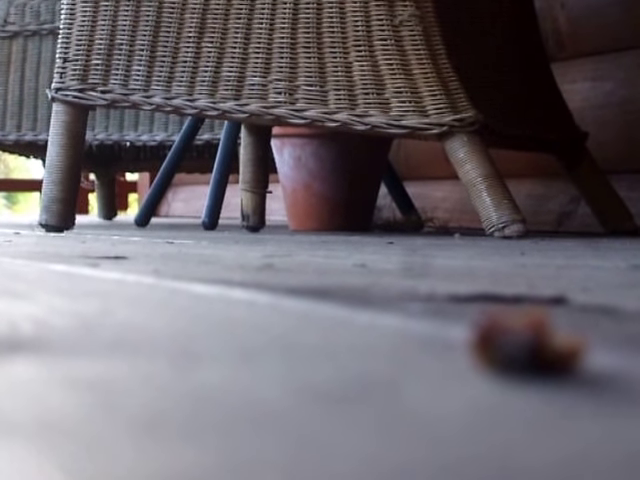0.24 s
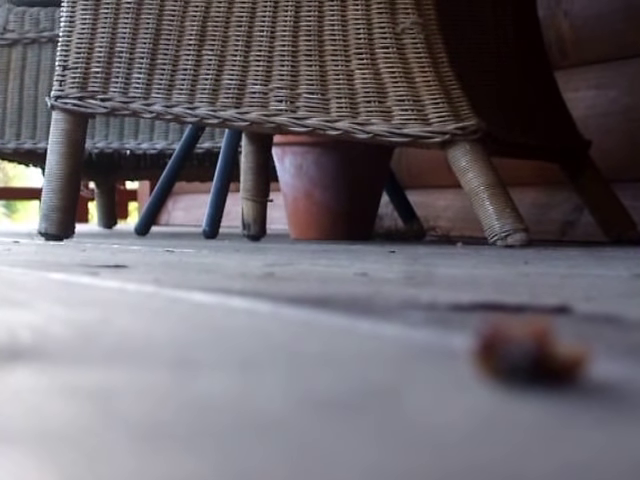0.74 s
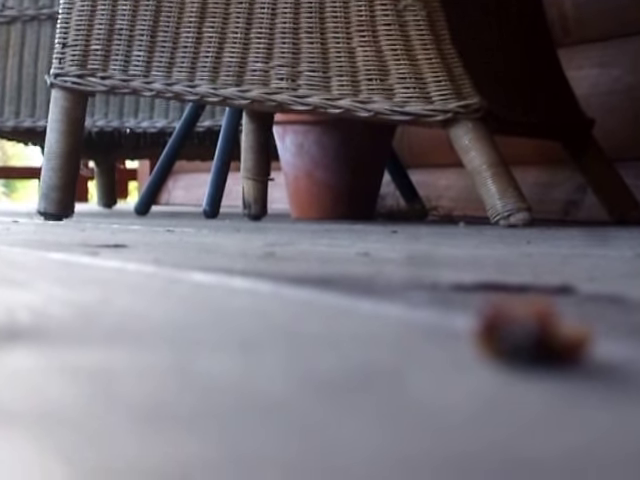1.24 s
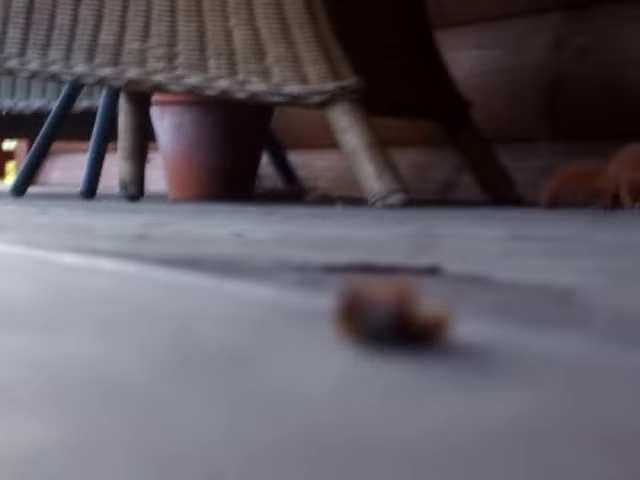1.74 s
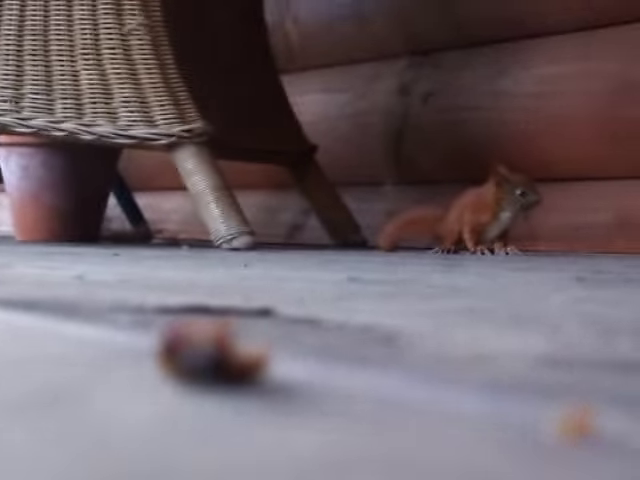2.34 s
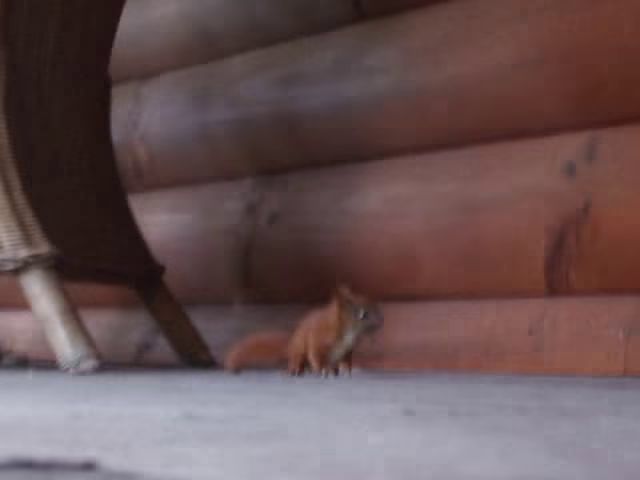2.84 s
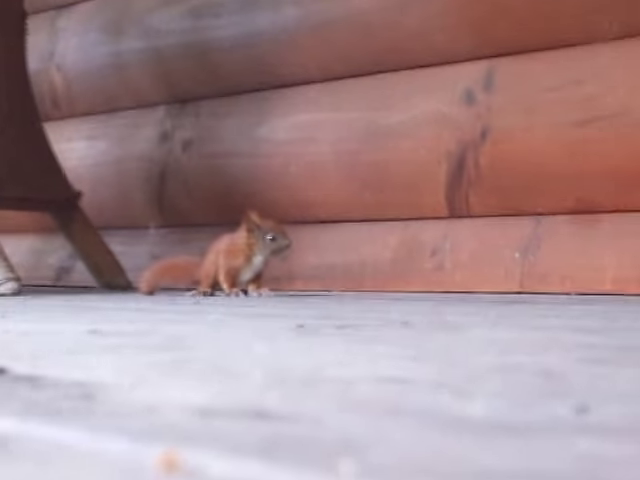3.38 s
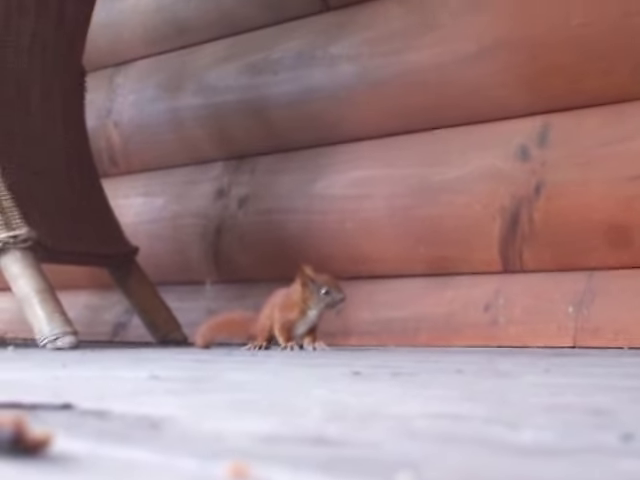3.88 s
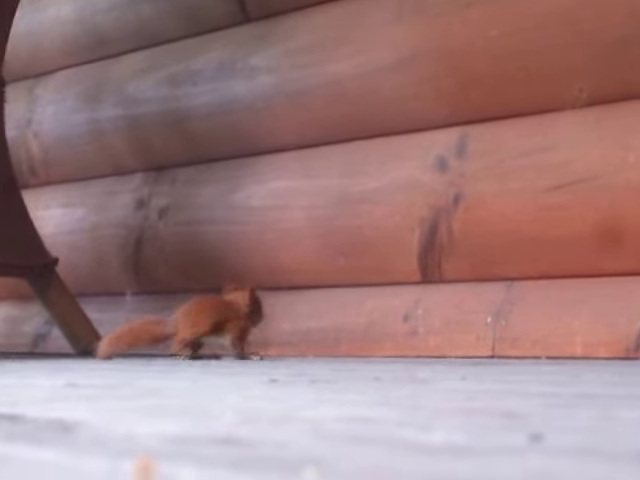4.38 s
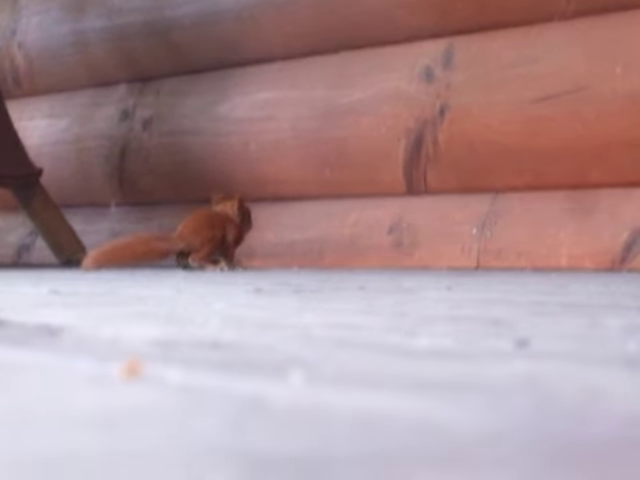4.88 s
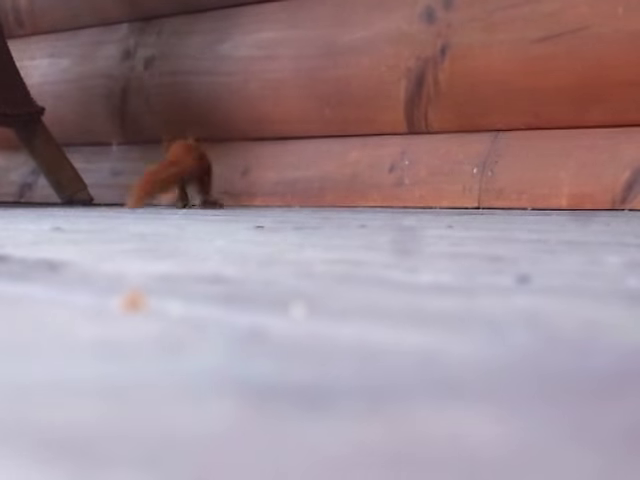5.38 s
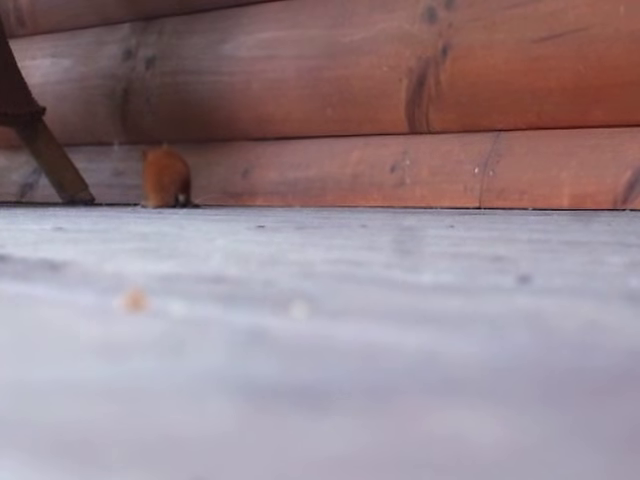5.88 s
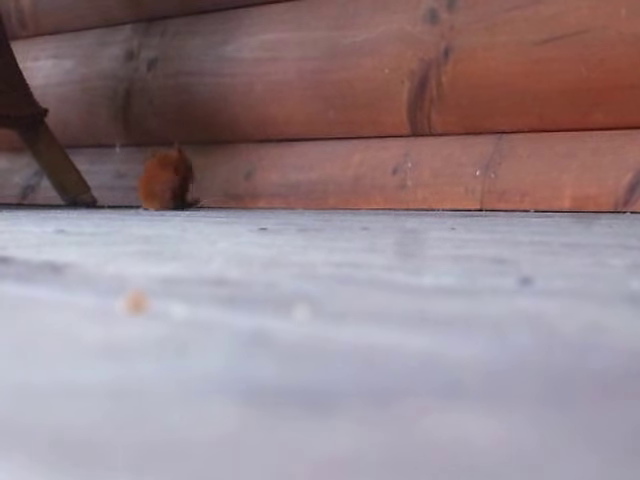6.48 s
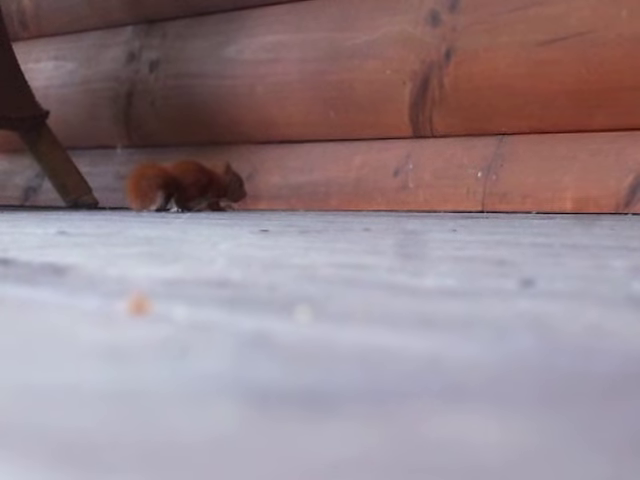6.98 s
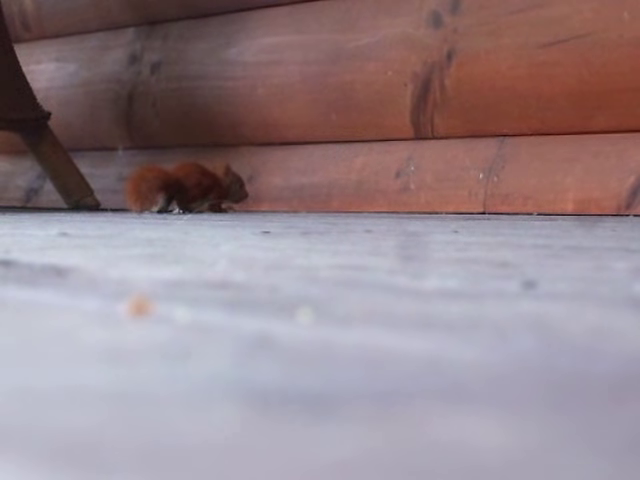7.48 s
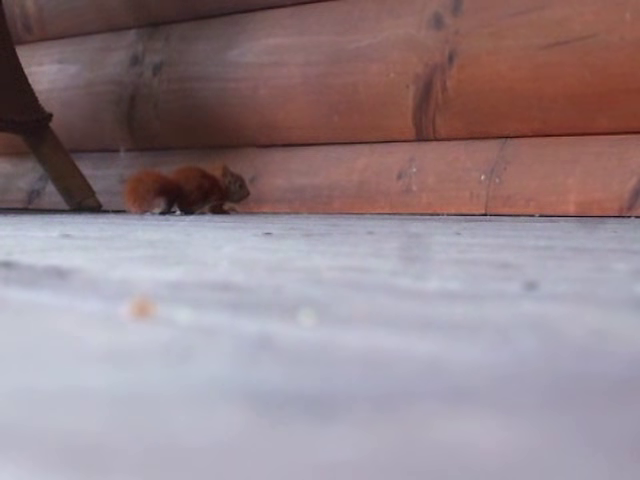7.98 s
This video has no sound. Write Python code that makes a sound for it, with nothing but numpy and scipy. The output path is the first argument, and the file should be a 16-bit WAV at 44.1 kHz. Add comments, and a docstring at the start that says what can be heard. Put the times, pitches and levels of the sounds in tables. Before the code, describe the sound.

Over steady outdoor hiss, a small camera lying on porch boards is brushed dully, then shoved in jerky, gritty scrapes with a brief squeal. After a pause it rocks with a sharp woody knock, then a soft thud. A squirrel a little way off makes sparse claw scratches, faint paw pats and grit ticks, with soft rustling near the end. A distant bird gives a few thin rising chirps.

```python
"""Porch with a squirrel, heard from a small camera resting on the boards; bird calls and hiss throughout.
0.3 s: dull brushing (noise in resonances). 0.6-1.6 s: camera shoved over grit (random slips ringing modes).
3.4 and 3.7 s: camera rocks and knocks, first sharply, then softly (decaying sines).
4.1-8.2 s: claws, paws and grit ticks (short slip bursts in resonances); from 6.8 s swells of rustle; 7.6 s: a wipe.
The bird, at 0.5, 2.1, 3.4 and 5.4 s, is a rising sine; the hiss is steady coloured noise."""
import sys
import numpy as np
from scipy import signal
from scipy.fft import rfft, irfft
from scipy.io import wavfile
from scipy.ndimage import uniform_filter1d

SR = 44100
rng = np.random.default_rng(int(sys.argv[2]) if len(sys.argv) > 2 else 0)


def bounce(signal):
    """Save signal as a 16-bit WAV file at the path given by the first command-line argument."""
    frames = np.transpose(np.atleast_2d(signal))
    limited = np.clip(frames, -1, 1)
    pcm = np.round(limited * 32767).astype(np.int16)
    wavfile.write(sys.argv[1], SR, pcm)


N = 362943

# Shoves of the camera: start t/s, length/s, rubbing level/dB, grit level/dB, sag over the shove/dB
SHOVES = [(0.567, 0.058, -36, -38.5, 5.5), (0.651, 0.016, -33.5, -39, -0.5), (.673, 0.051, -41, -45.5, 2),
          (0.812, 0.041, -37, -41, 2), (0.877, 0.067, -38.5, -43.5, 4), (0.95, 0.23, -46.5, -52, -2),
          (1.154, 0.063, -35, -36, -1), (1.216, 0.071, -37.5, -38, 5), (1.285, 0.026, -37, -36.5, 0),
          (1.306, 0.16, -31, -33.5, 6), (1.444, 0.11, -33.5, -34, 4)]
# Base catching on grit as it stops: start t/s, length/s, level/dB
CATCH = (1.538, 0.0094, -33)
# Squeal in the first shove: start t/s, length/s, level/dB
SQUEAL = (.583, 0.032, -29.5)
# Creeping base, one board mode stands out: start t/s, length/s, level/dB
CREEPS = [(0.869, .29, -42.5), (1.185, 0.04, -29)]
# Resonances of rubbing, grit, squeal and creep: f/Hz, width of one pass/Hz, relative level/dB
RUB_MODES = [(145, 9.1, -6), (268, 130, 1), (475, 74, 2), (605, 130, 3), (744, 62, 0.5), (1010, 32, 0),
             (1076, 39, -4.5)]
GRIT_MODES = [(2470, 160, 3.5), (2800, 1070, 8.5), (3420, 500, 5.5), (4700, 630, 1), (5700, 440, 2),
              (6180, 270, -2)]
SQUEAL_MODES = [(2000, 130, -8), (2500, 530, -12), (4550, 250, -9.5), (5430, 200, -12.5)]
CREEP_MODES = [(722, 200, 0)]
# Camera rocking on its base: t/s, relative level/dB, contact hardness as cut-off f/Hz
KNOCKS = [(3.434, 0, 7660), (3.4394, -3, 1100), (3.735, -2.5, 235), (3.7393, -2.5, 226),
          (3.7441, -9.5, 191)]
# Camera and board under a knock: f/Hz, level/dB, t60/s
KNOCK_MODES = [(134, -32, .3), (180, -41, 0.16), (276, -25, 0.094), (363, -17.5, 0.025), (463, -22, .04),
               (550, -16.5, 0.019), (760, -8, 0.018), (970, -33, .06), (1817, -26.5, .018),
               (2480, -16, 0.0081), (3447, -21.8, 0.01), (4900, -21, .0047), (5950, -19, 0.0053)]
# Claw scratches, paw landings, grit ticks: t/s, rms level over the length/dB, length/s, centre f/Hz
SCRATCHES = [(4.149, -38, 0.0013, 2800), (4.1785, -26.5, 0.0055, 2900), (4.1895, -31, .002, 2350),
             (4.369, -45.5, 0.016, 2200), (4.5685, -41, 0.0055, 2300), (4.579, -44, 0.01, 1900),
             (4.7478, -28.5, 0.0051, 2270), (4.7598, -29.5, 0.005, 2400), (5.819, -33, 0.0051, 3100),
             (5.823, -30.5, 0.0069, 3830), (5.830, -42, 0.022, 3100), (5.848, -50, 0.04, 3000),
             (5.982, -46, 0.011, 3320), (6.1835, -40.5, 0.0052, 3540), (6.192, -69, 0.016, 2800),
             (7.8285, -33, 0.015, 3370), (7.839, -34, 0.0066, 2800), (8.016, -36, 0.0093, 2400),
             (8.174, -44, 0.011, 1970), (8.187, -37.5, 0.015, 2720)]
PATS = [(4.083, -49, 0.015, 460), (4.184, -38.5, 0.0049, 344), (4.215, -48, 0.021, 607),
        (4.307, -43, 0.0061, 570), (4.37, -54.5, 0.092, 490), (4.505, -47.5, 0.049, 770),
        (4.57, -44, 0.034, 870), (4.752, -46, 0.024, 1120), (5.595, -49.5, 0.048, 630),
        (6.184, -54, 0.012, 430), (6.365, -53, 0.023, 377), (7.839, -34.5, 0.0076, 345),
        (7.68, -50.5, 0.015, 290), (7.85, -48, .035, 270), (8.021, -42.5, 0.011, 350),
        (8.197, -38, 0.0072, 320)]
TICKS = [(4.1495, -44, 0.0023, 5030), (4.3085, -37, 0.0028, 2000), (5.822, -38.5, .004, 6500),
         (6.184, -45.5, 0.0014, 2930), (6.746, -49, 0.0052, 2000), (6.769, -45.5, 0.01, 1270),
         (7.061, -40.5, 0.0044, 3500), (8.084, -42, 0.0025, 2500)]
# Resonances of claw, board under paw, tick: f/Hz, width of one pass/Hz, level before centre weighting/dB
CLAW_MODES = [(1010, 460, 14), (2200, 150, 3.5), (2304, 240, 2), (2730, 250, 0), (2990, 220, 0.5),
              (3540, 200, -7), (4200, 490, -7.5), (5430, 410, -9.5)]
PAW_MODES = [(299, 14, 1), (327, 55, 2.5), (376, 170, -3.5), (520, 270, -3), (740, 91, -1.5),
             (890, 250, -6)]
TICK_MODES = [(870, 1400, 8.5), (2800, 2700, 3), (6000, 2800, 1)]
# Rustle swells: peak t/s, rise time constant/s, fall time constant/s, peak level/dB
RUSTLES = [(6.801, 0.056, 0.094, -39.5), (7.06, .07, .065, -40.5), (7.66, 0.11, 0.14, -49),
           (8.17, .35, .5, -42)]
# Rustle spectrum shape: f/Hz, relative level per Hz/dB
RUSTLE_SPECTRUM = [(100, -31.5), (300, -8.5), (850, 4.5), (1400, 4.5), (2000, 3.5), (3300, 3.5), (4500, 3),
                   (6400, -1)]
# Dull brushing: start t/s, length/s, level/dB
BRUSH = (0.303, 0.245, -47.5)
# Brushing resonances: f/Hz, width/Hz, relative level/dB
BRUSH_MODES = [(510, 76, 0), (1040, 140, 1), (1450, 740, -14)]
# Wipe: rms level before its fades/dB, start f/Hz, end f/Hz
WIPE = (-45, 620, 1800)
# Bird calls: start t/s, length/s, start f/Hz, end f/Hz, starting level/dB
BIRD_CALLS = [(0.452, .095, 3620, 4550, -59), (2.075, 0.062, 4080, 4820, -53),
              (3.447, .1, 3590, 4560, -49.5), (5.42, .122, 3680, 4700, -53)]
# Reverberation of the porch: f/Hz, t60/s
PORCH_T60 = [(130, 0.22), (500, 0.39), (2500, 0.22), (7000, 0.11)]
# Spectrum shape of outdoor air and microphone hiss: f/Hz, relative level per Hz/dB
AIR_SPECTRUM = [(25, -4.5), (60, -2.5), (120, -4), (250, -4.5), (400, -3.5), (550, -3), (700, -3),
                (950, -1), (1400, -7.5), (2000, -6.5), (2800, -6), (4200, -8), (6200, -10), (7000, -15)]

SHOVE_ATTACK_S, SHOVE_RELEASE_S = 0.015, 0.0075
SQUEAL_ATTACK_S, BRUSH_ATTACK_S = 0.022, 0.046
CREEP_SAG_DB, CALL_FADE_DB = 5, 3.5
SWEEP_EXPONENT = 1.35  # above 1: the call climbs ever faster
WIPE_START_S, WIPE_LENGTH_S, WIPE_WIDTH_HZ = 7.6, 0.09, 650
AIR_RMS_DB = -47
EDGE_HZ = 6850


def slide():
    """Camera base sticks and slips over grit, ringing board and housing."""
    pressure = judder(per_s=110, depth_db=1.56)
    fine = pressure * grains(N, per_s=9000, spread_db=4.0)
    coarse = pressure * grains(N, per_s=700, spread_db=2.0)

    rub_force = sum(shove(s, length, db, sag) for s, length, db, _, sag in SHOVES)
    grit_force = sum(shove(s, length, db, sag) for s, length, _, db, sag in SHOVES)
    grit_force = grit_force + shove(*CATCH)
    squeal_force = envelope(*SQUEAL, SQUEAL_ATTACK_S, SHOVE_RELEASE_S, sag_db=2.5)
    creep_force = sum(shove(*row, CREEP_SAG_DB) for row in CREEPS)

    rub_tone = cut(ring(fine + 0.4 * coarse, RUB_MODES), hz=1520, side="low", order=6)
    rub = evened(rub_tone) * rub_force
    grit = evened(ring(fine + 0.72 * coarse, GRIT_MODES)) * grit_force
    squeal = evened(ring(fine, SQUEAL_MODES)) * squeal_force
    creep_tone = ring(ring(coarse, CREEP_MODES), CREEP_MODES)
    creep = evened(creep_tone) * creep_force
    return rub + grit + squeal + creep


def knocks():
    """Base strikes the board in quick contacts; softer contacts drive the high modes less."""
    t = np.arange(SR // 2) / SR
    out = np.zeros(N)
    for s, db, hard_hz in KNOCKS:
        for hz, mode_db, t60_s in KNOCK_MODES:
            push = gain_of(db + mode_db) / np.sqrt(1 + (hz / hard_hz) ** 4)
            decay = np.exp(-np.log(1000) * t / t60_s)
            add(out, s, push * decay * np.sin(2 * np.pi * hz * t))
    return out


def squirrel():
    """Claws scratch, paws pat the boards and bits of grit tick."""
    claws = strokes(SCRATCHES, CLAW_MODES, octaves=0.46, release_s=0.00065, snag_db=19)
    paws = strokes(PATS, PAW_MODES, octaves=0.58, release_s=0.0015, snag_db=23.5)
    ticks = strokes(TICKS, TICK_MODES, octaves=1.9, release_s=0.0008, snag_db=21)
    return claws + paws + ticks


def strokes(rows, body, octaves, release_s, snag_db):
    """A first snag and a short run of slips ring the body's modes near each contact's centre frequency."""
    t = np.arange(SR // 8) / SR
    out = np.zeros(N)
    for s, db, length, centre_hz in rows:
        contact = np.exp(-np.maximum(t - length, 0) / release_s)
        snag = gain_of(snag_db) * (t == 0)
        drive = contact * grains(len(t), per_s=8300, spread_db=3.5) + snag
        sound = np.zeros(len(t))
        for hz, width_hz, mode_db in body:
            weight = np.exp(-0.5 * (np.log2(hz / centre_hz) / octaves) ** 2)
            mode = [(hz, width_hz, 0)]
            sound += gain_of(mode_db) * weight * ring(ring(drive, mode), mode)  # twice: steep skirts
        # window rms rescaled to rms over the contact length
        add(out, s, gain_of(db) * evened(sound) * np.sqrt(length / t[-1]))
    return out


def rustle():
    """Dense fine grains swell as soft wide rustle; resonant noise makes a duller brushing."""
    t = np.arange(N) / SR
    swells = np.zeros(N)
    for s, rise_s, fall_s, db in RUSTLES:
        swells += gain_of(db) * np.exp(-np.maximum((s - t) / rise_s, (t - s) / fall_s))
    wide = coloured(grains(N, per_s=9000, spread_db=4.5), RUSTLE_SPECTRUM) * swells
    brushing = envelope(*BRUSH, BRUSH_ATTACK_S, SHOVE_RELEASE_S, sag_db=2.0)
    dull = evened(ring(rng.standard_normal(N), BRUSH_MODES)) * brushing
    return wide + dull


def wipe():
    """Friction noise in one band that glides upwards: low-passed noise on a rising carrier."""
    db, from_hz, to_hz = WIPE
    size = round(WIPE_LENGTH_S * SR)
    out = np.zeros(N)
    turns = np.cumsum(np.geomspace(from_hz, to_hz, size)) / SR
    fuzz = cut(rng.standard_normal(N), hz=WIPE_WIDTH_HZ / 2, side="low", order=2)[-size:]
    band = evened(fuzz * np.sin(2 * np.pi * turns))
    add(out, WIPE_START_S, gain_of(db) * band * signal.windows.cosine(size))
    return out


def bird():
    """Thin whistle sweeping upwards, its pitch wavering and its level fluttering."""
    out = np.zeros(N)
    for s, length, from_hz, to_hz, db in BIRD_CALLS:
        u = np.linspace(0, 1, round(length * SR))
        waver = evened(uniform_filter1d(rng.standard_normal(N), size=90))[:len(u)]
        sweep_hz = from_hz * (to_hz / from_hz) ** (u ** SWEEP_EXPONENT)
        turns = np.cumsum(sweep_hz * (1 + 0.012 * waver)) / SR
        flutter = judder(per_s=90, depth_db=4.0)[:len(u)]
        level = gain_of(db - CALL_FADE_DB * u) * signal.windows.tukey(len(u), 0.15) * flutter
        add(out, s, np.sqrt(2) * level * np.sin(2 * np.pi * turns))  # sqrt 2: sine at unit rms
    return out


def porch(x):
    """Scattered reflections from the log wall and roof, each band dying at its own speed."""
    at = np.arange(300, SR // 2, 20)
    taps = np.zeros(SR)
    taps[at + rng.integers(0, 20, len(at))] = rng.choice([-1., 1.], len(at))
    hz, t, bands = signal.stft(taps, SR, nperseg=256)
    decay = np.exp(-np.log(1000) * t / read(PORCH_T60, hz)[:, None])
    tail = signal.istft(bands * decay, SR)[1]
    return signal.fftconvolve(x, tail / np.linalg.norm(tail))[:N]


def air():
    """Steady hiss with a soft outdoor murmur: one noise with a fixed spectrum."""
    return gain_of(AIR_RMS_DB) * coloured(rng.standard_normal(N), AIR_SPECTRUM)


def grains(size, per_s, spread_db):
    """Random slips of either sign, a few much larger than the rest, at unit rms."""
    heights = gain_of(spread_db * np.minimum(rng.exponential(1, size), 4))
    signs = rng.choice([-1, 1], size)
    return evened(heights * signs * (rng.random(size) < per_s / SR))


def ring(x, body):
    """Passes a drive through parallel resonances."""
    out = 0
    for hz, width_hz, db in body:
        b, a = signal.iirpeak(hz, hz / width_hz, SR)
        out = out + gain_of(db) * signal.lfilter(b, a, x)
    return out


def judder(per_s, depth_db):
    """Uneven pressure: a gain wandering at random between knots, at unit rms."""
    t = np.arange(N) / SR
    knots = np.arange(0, t[-1] + 1, 1 / per_s)
    wander = np.interp(t, knots, rng.standard_normal(N)[:len(knots)])
    return evened(gain_of(depth_db * wander))


def shove(start, length, db, sag_db=0):
    """Force of one push: builds, may ease off, stops."""
    return envelope(start, length, db, SHOVE_ATTACK_S, SHOVE_RELEASE_S, sag_db)


def envelope(start, length, db, attack_s, release_s, sag_db):
    """Linear attack, a hold that sags in dB, exponential release."""
    t = np.maximum(np.arange(N) / SR - start, 0)
    hold = gain_of(db - sag_db * np.minimum(t / length, 1))
    return np.minimum(t / attack_s, 1) * hold * np.exp(-np.maximum(t - length, 0) / release_s)


def coloured(x, spectrum):
    """Weights a signal by a spectrum, at unit rms."""
    hz = np.fft.rfftfreq(len(x), 1 / SR)
    return evened(irfft(rfft(x) * gain_of(read(spectrum, hz)), len(x)))


def cut(x, hz, side, order):
    """Butterworth filter; side names the band that passes."""
    return signal.sosfilt(signal.butter(order, hz, side, fs=SR, output="sos"), x)


def read(points, hz):
    """Interpolates a table on a log-frequency axis."""
    f, value = np.transpose(points)
    return np.interp(np.log(hz + 1), np.log(f + 1), value)


def gain_of(db):
    """Decibels to amplitude gain."""
    return 10 ** (np.asarray(db) / 20)


def evened(x):
    """Scales to unit rms."""
    return x / np.sqrt(np.mean(x ** 2) + 1e-20)


def add(mix, s, sound):
    """Adds a sound into the mix, starting at s seconds."""
    part = mix[round(s * SR):][:len(sound)]
    part += sound[:len(part)]


def scene():
    """Camera noises almost dry, squirrel with more porch echo, far bird with the most."""
    camera, animal, calls = slide() + knocks(), squirrel(), bird()
    echoes = porch(gain_of(-27) * camera + gain_of(-13.5) * animal + gain_of(-12) * calls)
    sound = camera + animal + calls + echoes + rustle() + wipe()
    # the small microphone drops the deep bass; the air is added after that
    return (cut(sound, hz=125, side="high", order=8) + air())[None]


def record(dry):
    """Narrow-band recorder: linear-phase low-pass with a steep upper edge."""
    edge = signal.firwin(91, EDGE_HZ, window=("kaiser", 6), fs=SR)
    return signal.oaconvolve(dry, edge[None], "same")


dry = scene()
out = record(dry)
bounce(out)
```